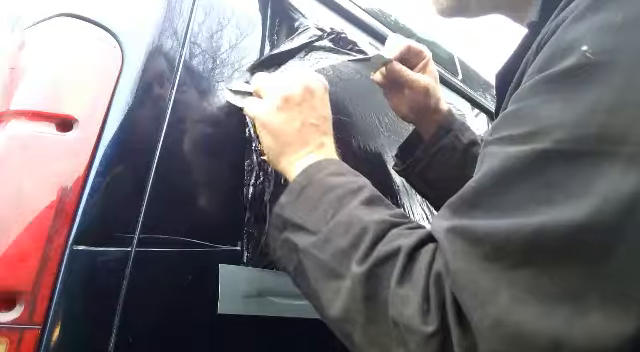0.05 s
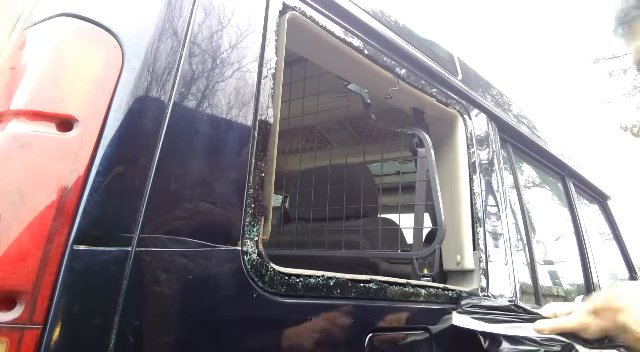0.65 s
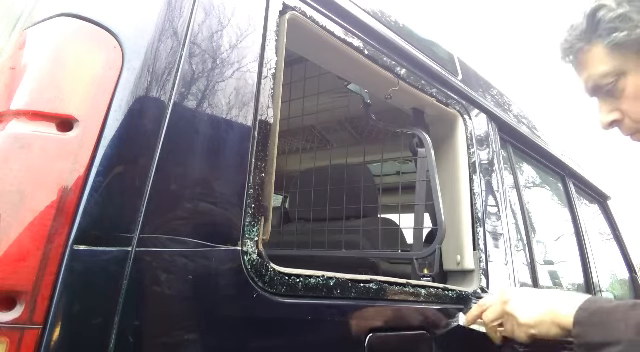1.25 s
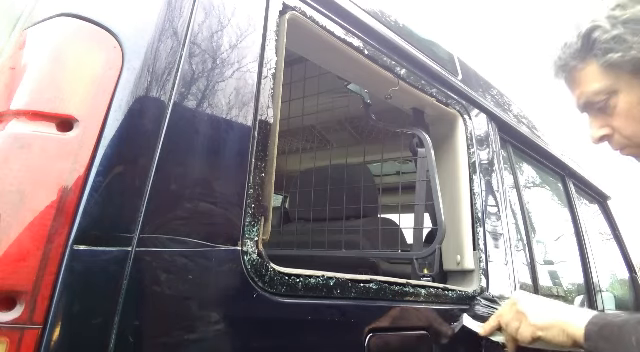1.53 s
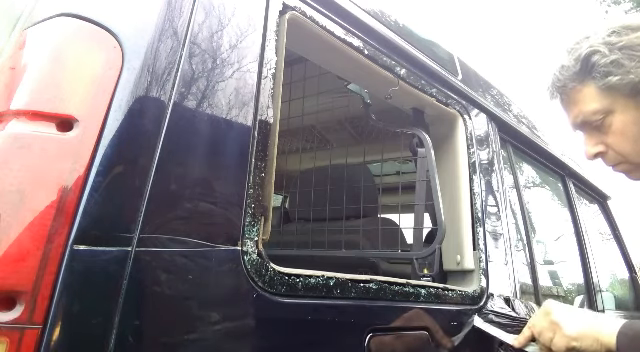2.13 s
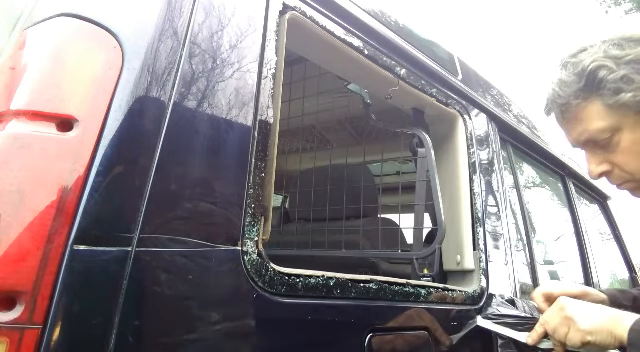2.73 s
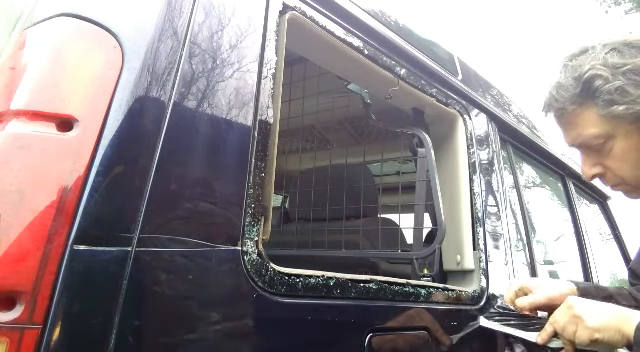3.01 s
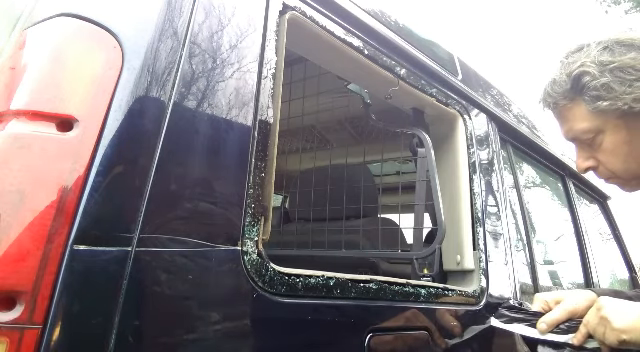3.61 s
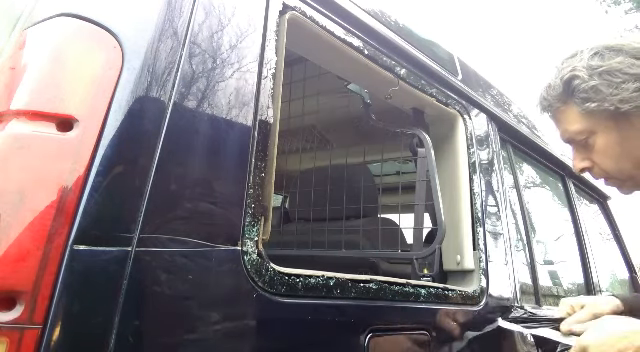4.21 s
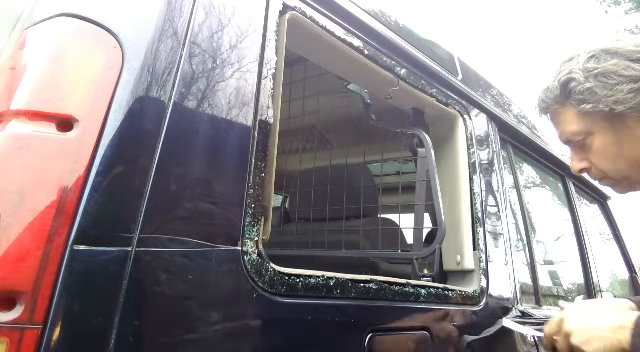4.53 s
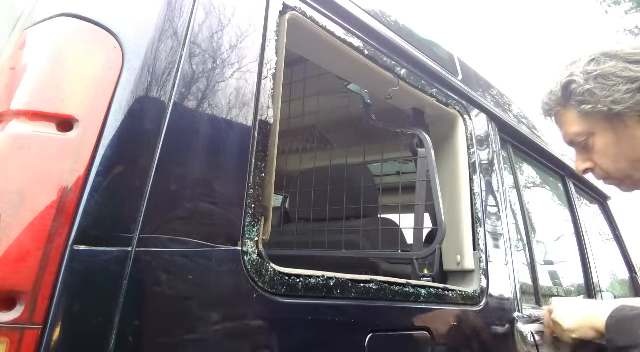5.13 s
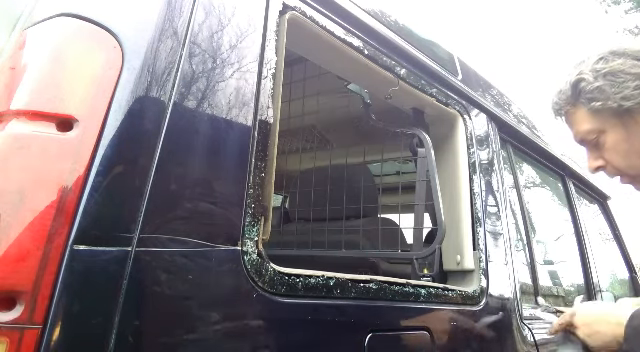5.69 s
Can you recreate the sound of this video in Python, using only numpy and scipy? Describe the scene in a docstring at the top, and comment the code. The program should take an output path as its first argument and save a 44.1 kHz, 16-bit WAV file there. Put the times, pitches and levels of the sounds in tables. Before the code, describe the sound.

Close outdoor crackle of duct tape and plastic film being tugged and peeled from a car's side, ending in a hard rip and thud.

```python
"""Outdoors by a parked car, a small stereo microphone close to a side window covered in plastic and tape.
First a few hard tugs make the stretched sheet snap and drum on the bodywork, until an edit cuts them off.
A second shot begins quietly, then duct tape is picked and peeled a little farther to the right: glue
crackles as it slips, loose film slides, wrinkles tick. Just past five seconds a last hard rip sets the
side panel ringing with a full thud. Light wind touches the microphone throughout."""
import sys
import numpy as np
from scipy import signal
from scipy.fft import rfft, irfft
from scipy.io import wavfile

SR = 44100
rng = np.random.default_rng(int(sys.argv[2]) if len(sys.argv) > 2 else 0)


def store_pcm(level_fs):
    """Save levels as 16-bit WAV."""
    pcm = np.round(np.clip(level_fs, -1, 1) * 32767).astype(np.int16)
    wavfile.write(sys.argv[1], SR, np.atleast_2d(pcm).T)


N = 262659
CUT_S = 0.528   # the edit between the two shots
PUSH_DELAY_S = 0.0007   # from the start of a snap to its push


def handling(levels, surface_modes, snap_ring, start, end):
    """One stretch of work on the film, sounding through the surface that holds it."""
    # creases snapping and tape letting go: t/s, crack level/dB, blow level/dB
    all_snaps = [(0.0396, -25.5, -34.5), (0.0487, -29, -32), (0.054, -33, -43), (0.124, -35, -47),
                 (0.168, -22.5, -28), (0.1839, -26.5, -32.5), (0.198, -31.5, -34.5), (0.2425, -28.5, -38),
                 (0.3455, -36, -45), (0.4357, -26.5, -29), (0.45, -34, -44), (0.4867, -22, -30),
                 (0.4953, -23.5, -32), (0.515, -29, -33), (0.5257, -31, -46), (1.5285, -38, -43.5),
                 (1.7148, -33.5, -38), (1.742, -33, -37), (1.788, -29, -33), (1.8162, -34, -38),
                 (2.021, -29, -43), (2.0576, -16.5, -67), (2.103, -21, -59), (2.221, -10, -45.5),
                 (2.427, -33, -50), (2.5863, -29.5, -49.5), (3.041, -26, -43), (3.123, -30.5, -50),
                 (3.1994, -28.5, -36), (3.3917, -28, -36.5), (3.72, -29, -36), (4.263, -30, -41.5),
                 (5.1251, -33, -38), (5.1896, -21.5, -25.5), (5.2029, -24.5, -28), (5.482, -37, -42),
                 (5.5126, -24, -32.5)]
    # fingers bumping the bodywork and dull pops of the film: t/s, level/dB, f/Hz
    all_bumps = [(0.255, -31, 75), (0.316, -21.5, 191), (1.529, -28, 1700), (2.362, -30, 395),
                 (2.3624, -33.5, 1150), (2.428, -32.5, 392), (2.4287, -35, 1120), (3.033, -29.5, 420),
                 (3.266, -23, 1750)]
    snaps = [row for row in all_snaps if start <= row[0] < end]
    bumps = [row for row in all_bumps if start <= row[0] < end]
    drum_db, peel_db, rub_db = levels
    drive = peeling(drum_db, peel_db) + blows(snaps) + scrapes()
    surface = resonant(drive, surface_modes, width_at_1k_hz=17.3)
    film = cracks(snaps) + snap_ring(snaps) + crinkles(rub_db) + sliding(rub_db)
    t = np.arange(N) / SR
    return (surface + film + knocks(bumps)) * ((t >= start) & (t < end))


def effort():
    """The hands hold, pull and slide the film. Gives curves of drumming, crackle and rubbing in dB."""
    # pulls on the tape: t/s of greatest tension, length/s, drumming level/dB, crackle level/dB
    pulls = [(0.08, 0.097, -50, -52.5), (0.243, 0.054, -44.5, -51.5), (0.453, 0.027, -43, -55),
             (0.702, 0.024, -39.5, -51), (1.308, 0.062, -50, -62), (1.404, 0.057, -42.5, -51),
             (1.581, 0.023, -45.5, -56.5), (1.718, 0.12, -40, -46.5), (1.832, 0.13, -45, -50.5),
             (2.034, 0.18, -46, -51.5), (2.252, 0.06, -65, -47.5), (2.352, 0.14, -49, -52),
             (3.06, 0.17, -50, -55), (3.204, 0.11, -42, -44.5), (3.257, 0.038, -50, -46),
             (3.401, 0.021, -38.5, -46), (3.43, 0.077, -42.5, -49), (3.649, 0.13, -42, -47.5),
             (3.73, 0.085, -37.5, -53), (3.897, 0.17, -49.5, -52), (4.208, 0.1, -40.5, -51.5),
             (4.485, 0.18, -46.5, -63), (4.554, 0.15, -53, -53), (4.779, 0.11, -42, -51),
             (4.987, 0.088, -43, -53.5), (5.142, 0.024, -37.5, -43.5), (5.23, 0.075, -35, -41.5),
             (5.513, 0.063, -46.5, -45.5)]
    # loose film drawn through the hand: middle t/s, half length/s, rubbing level/dB, crackle level/dB
    slides = [(0.71, 0.045, -59.5, -59.5), (1.14, 0.037, -59.5, -67), (1.614, 0.11, -61, -53),
              (2.108, 0.055, -51, -70), (2.516, 0.056, -52.5, -55), (2.847, 0.055, -55, -52.5),
              (3.594, 0.21, -55, -75), (4.142, 0.12, -49, -74), (4.385, 0.094, -49.5, -51.5),
              (5.946, .14, -47.5, -75)]
    # brief dips where drumming and crackle drop out and the hiss remains: middle t/s, half length/s
    dips = [(2.75, 0.012), (3.346, 0.005), (4.113, 0.03), (4.359, 0.018), (5.175, 0.0036), (5.926, 0.063)]
    t = np.arange(N) / SR
    # the hands never hold quite still; the second shot begins quietly; taut film hardly rubs
    quiet, taut = (t >= CUT_S) & (t < 0.675), t < CUT_S
    drum = from_db(-56.5 - 23 * quiet) ** 2
    peel = from_db(-63 - 23 * quiet) ** 2
    rub = from_db(-63 - 5 * quiet - 5.5 * taut) ** 2
    build, release = 0.65, 0.85   # rise and fall by a factor e, as shares of a pull's length
    for s, length_s, drum_db, peel_db in pulls:
        away = np.maximum((s - t) / build, (t - s) / release) / length_s
        near = away < 5
        tension = np.exp(-away[near] ** 1.28)
        drum[near] += (tension * from_db(drum_db)) ** 2
        peel[near] += (tension * from_db(peel_db)) ** 2
        rub[near] += (tension * from_db(peel_db - 4.5)) ** 2
    rub += swells([(s, half_s, db) for s, half_s, db, _ in slides], steepness=2.13)
    peel += swells([(s, half_s, db) for s, half_s, _, db in slides], steepness=2.13)
    # one strip of tape unzips at an even speed, then stops
    from_s, to_s, edge_s = 2.585, 2.752, 0.013
    unzipping = (np.tanh((t - from_s) / edge_s) - np.tanh((t - to_s) / edge_s)) / 2
    rub += unzipping * from_db(-47) ** 2
    peel += unzipping * from_db(-50.5) ** 2
    dip_db = -19.5 * sum(np.exp(-((t - s) / half_s) ** 2) for s, half_s in dips)
    return power_db(drum) + dip_db, power_db(peel) + dip_db, power_db(rub)


def cracks(snaps):
    """A crease flips with a bright crack, which comes back at once off the door."""
    # spectrum of a crack: f/Hz, relative level/dB
    spectrum = [(500, -17), (1500, -25), (3000, -13), (4600, 1), (5800, -0.5), (6700, 1.5), (12000, -2.5),
                (15000, -5), (17000, -37)]
    door_echo_s = 0.0021
    s, crack_db, _ = np.transpose(snaps)
    flips = bursts(s, crack_db, rise_s=0.00061, t60=0.0047)
    echo = from_db(-5) * np.interp(np.arange(N) - door_echo_s * SR, np.arange(N), flips)
    early = scattered(flips + echo, wet_db=-5.5, t60=0.0037)
    return from_db(-4.0) * coloured(scattered(early, wet_db=-3.5, t60=0.047), spectrum)


def blows(snaps):
    """The jerk of each snap passes into the surface under the tape."""
    # spectrum of a blow: f/Hz, relative level/dB
    spectrum = [(40, -23), (130, -8), (280, -1), (500, -4), (750, -9.5), (1250, -7), (1750, -11),
                (4000, -7.5), (9000, -44.5)]
    s, _, blow_db = np.transpose(snaps)
    ragged = from_db(2.3 * drift(500) - 1)
    jerks = ragged * bursts(s, blow_db, rise_s=0.00088, t60=0.024)
    return from_db(1.5) * coloured(scattered(jerks, wet_db=-3.5, t60=0.062), spectrum)


def sheet_thumps(snaps):
    """Each jerk thumps the stretched sheet like a slack drum skin, with a short hollow note."""
    # broad notes of the sheet: f/Hz, level/dB relative to the blow, t60/s
    notes = [(203, -8, 0.07), (331, -2.5, 0.046), (1160, 2, 0.022)]
    out = np.zeros(N)
    for s, _, blow_db in snaps:
        push = np.arange(N) == int((s + PUSH_DELAY_S) * SR)
        for hz, db, t60 in notes:
            detune = 1 + 0.045 * rng.standard_normal()
            out += ring(from_db(blow_db + db) * push, hz * detune, t60)
    return out


def crease_ring(snaps):
    """The stiff edge of the tape rings after each crack, with a slightly different balance every time."""
    # modes of the tape's edge: f/Hz, level/dB relative to the crack
    modes = [(1900, -32), (3000, -25.5), (4800, -33), (5200, -13), (7117, -26), (7790, -22), (8177, -18.5),
             (8690, -18), (10080, -15)]
    s, crack_db, _ = np.transpose(snaps)
    strengths_db = crack_db[:, None] + 1.5 * rng.standard_normal((len(s), len(modes)))
    out = np.zeros(N)
    for k, (hz, db) in enumerate(modes):
        clicks = np.zeros(N)
        clicks[((s + PUSH_DELAY_S) * SR).astype(int)] = from_db(strengths_db[:, k] + db)
        out += ring(clicks, hz, t60=0.033)
    return out


def peeling(drum_db, peel_db):
    """Glue lets go in slips: the big ones drum on the surface, the small ones crackle."""
    # spectrum of the drumming surface: f/Hz, relative level/dB
    drum_spectrum = [(40, -16.5), (100, -4), (150, 2), (300, -1), (480, -2.5), (700, -11.5), (1000, -14),
                     (1500, -14.5), (2500, -35), (6000, -46)]
    # spectrum of the crackling glue: f/Hz, relative level/dB
    peel_spectrum = [(300, 2), (800, 5.5), (1400, 4), (2000, 7.5), (3300, 4), (5000, 1.5), (8000, -9),
                     (16000, -41)]
    tugs = grains(per_s=1500, spread_db=2.0, clump_db=2.5, clump_rate=49) * from_db(drum_db)
    slips = grains(per_s=1300, spread_db=1.5, clump_db=4.0, clump_rate=64) * from_db(peel_db)
    drum = coloured(scattered(tugs, wet_db=-5.5, t60=0.025), drum_spectrum)
    crackle = coloured(scattered(slips, wet_db=1.0, t60=0.022), peel_spectrum)
    return from_db(-5.5) * drum + from_db(-3.5) * crackle


def panel_thud():
    """The last hard rip sets the car's side panel ringing with a full thud; low modes ring longest."""
    # panel modes struck by the rip: f/Hz, level/dB
    modes = [(143, -42.5), (233, -39.5), (273, -43), (350, -39), (417, -44), (612, -35.5), (863, -34),
             (1348, -46), (1538, -34), (1783, -29.5)]
    rip_s, swell_s, t60_at_1k_s = 5.191, 0.011, 0.21
    t = np.maximum(np.arange(N) / SR - rip_s, 0)
    fall_db = 60 * t / t60_at_1k_s
    thud = sum(from_db(db - fall_db * np.sqrt(hz / 1000)) * np.sin(2 * np.pi * (hz * t + rng.random()))
               for hz, db in modes)
    return (1 - np.exp(-t / swell_s)) * thud


def knocks(bumps):
    """Soft contacts have no sharp edge and ring only briefly."""
    out = np.zeros(N)
    for s, db, hz in bumps:
        contact = np.arange(N) == int(s * SR)
        push = signal.lfilter(*signal.butter(2, 2 * hz, fs=SR), contact + 1e-18)
        out += from_db(db) * ring(push, hz, t60=0.26 / np.sqrt(hz))
    return out


def ticks():
    """A wrinkle flips with one sharp click, each at a pitch of its own."""
    # single wrinkles in the tape: t/s, level/dB
    wrinkles = [(1.2002, -34), (1.3771, -38.5), (1.4192, -33), (1.587, -35), (1.6746, -33), (1.8961, -33),
                (2.1418, -35), (2.3461, -38), (2.4683, -28), (2.6374, -32), (2.6489, -33), (2.7599, -32.5),
                (2.8474, -32), (2.9014, -30.5), (3.1777, -31), (3.2573, -30), (3.6509, -31), (3.7045, -27),
                (3.7723, -28), (3.8911, -30), (4.501, -29), (4.5555, -33), (4.6114, -34)]
    out, length = np.zeros(N), SR // 100
    decay = np.exp(-np.arange(length) / SR / 0.00068)
    for s, db in wrinkles:
        start, hz = int(s * SR), rng.uniform(4530, 8500)
        click = ring(rng.standard_normal(length) * decay, hz, t60=4 / hz)
        out[start:start + length] += from_db(db + 1) * click / np.abs(click).max()
    return scattered(out, wet_db=1, t60=0.028)


def sliding(rub_db):
    """Loose film rubs on itself with a fine rasp."""
    # spectrum of rubbing film: f/Hz, relative level/dB
    spectrum = [(400, -9), (1500, -13.5), (3000, -0.5), (5000, 3), (7000, 3), (8800, 4), (10500, 1.5),
                (12500, -2.5), (14500, -10), (16500, -58)]
    rub = from_db(-3.5) * grains(per_s=9000, spread_db=5.0, clump_db=2.5, clump_rate=150)
    return coloured(scattered(rub * from_db(rub_db), wet_db=6.0, t60=0.0049), spectrum)


def crinkles(rub_db, size_count=12):
    """Small wrinkles pop one by one; each size rings at its own pitch for a few cycles."""
    pops = grains(per_s=170, spread_db=3.5, clump_db=4.5, clump_rate=30) * from_db(rub_db)
    size = rng.integers(0, size_count, N)
    rings = sum(np.sqrt(hz / SR) * ring(pops * (size == k), hz, t60=7 / hz)
                for k, hz in enumerate(np.linspace(1600, 11500, size_count)))
    return from_db(-7.5) * scattered(rings, wet_db=-9.5, t60=0.016)


def scrapes():
    """Dragged tape sticks and slips, and the fold it pulls up gives the rasp a hollow pitch."""
    # short drags over the paint: middle t/s, half length/s, level/dB, f/Hz
    drags = [(1.734, 0.016, -45.5, 470), (1.802, 0.013, -48, 453), (2.311, 0.0059, -44, 2050),
             (3.207, 0.0087, -44.5, 880), (3.673, 0.054, -48, 900), (5.146, 0.016, -42.5, 1700),
             (5.219, 0.016, -38.5, 1600)]
    t, out = np.arange(N) / SR, np.zeros(N)
    slips = grains(per_s=1200, spread_db=1.0, clump_db=1.5, clump_rate=58)
    for s, half_s, db, hz in drags:
        swell = from_db(db) * np.exp(-((t - s) / half_s) ** 2 / 2)
        out += swell * rms_one(ring(slips, hz, t60=10 / hz))
    return out


def booming(x, hz=134, width_hz=80):
    """The panel's deepest band is driven more or less strongly as the hands move along it."""
    # gain of that band, set by where the tape holds the panel: t/s, level/dB
    boom = [(0.5, -18), (1.8, -9), (3.1, 1), (4.3, 1), (5.6, -6.5)]
    deep = signal.lfilter(*signal.iirpeak(hz, hz / width_hz, fs=SR), x)
    return x + (from_db(in_time(boom)) - 1) * deep


def hollow(x, width_hz=44, block=256):
    """The pocket under the lifted tape adds one resonance that glides as the tape moves."""
    # pitch of the pocket, which changes with its size: t/s, f/Hz
    pitch = [(1.4, 320), (1.75, 428), (1.9, 363), (2.1, 412), (3.2, 344), (3.7, 296), (5.2, 264)]
    centre_hz = in_time(pitch)
    r = np.exp(-np.pi * width_hz / SR)
    out, state = np.zeros_like(x), np.zeros((2, 2))
    for i in range(0, N, block):
        poles = [1, -2 * r * np.cos(2 * np.pi * centre_hz[i] / SR), r * r]
        out[:, i:i + block], state = signal.lfilter([1, 0, -1], poles, x[:, i:i + block], zi=state)
    return x + from_db(-4.5) * (1 - r * r) / 2 * out


def air():
    """Lumpy gusts over a light breeze, mostly on the right port, and a quiet outdoor floor."""
    # gusts on the microphone: middle t/s, half length/s, level/dB
    gusts = [(0.12, 0.13, -49), (0.33, 0.089, -41), (3.04, 0.1, -49.5), (3.62, 0.065, -44.5),
             (4.04, 0.16, -48), (4.45, 0.18, -45.5), (5.36, 0.086, -48.5), (5.75, 0.1, -40)]
    # spectrum of the wind: f/Hz, relative level/dB
    wind_spectrum = [(10, -13), (28, -5.5), (50, -12.5), (90, -14.5), (180, -31), (500, -61), (2000, -83)]
    # spectrum of the open air: f/Hz, relative level/dB
    floor_spectrum = [(20, 13), (120, 9.5), (300, -4), (700, -6), (2000, -18.5), (8000, -30), (16000, -40)]
    breeze = from_db(-68.5) ** 2
    wind_db = power_db(breeze + swells(gusts, steepness=1.93))
    wind = coloured(rng.standard_normal((2, N)), wind_spectrum) * from_db(wind_db + 2.0 * drift(29))
    floor = coloured(rng.standard_normal(N) + rng.standard_normal((2, N)), floor_spectrum)
    return wind * from_db([[-7], [5.5]]) + from_db(-63.0) * floor


def at_ports(x, left_lag_ms):
    """Two close microphone ports share the bass; one hears later, and the right gets less treble."""
    # treble shading: t/s, left minus right level/dB
    shade = [(0, 6), (0.5, 10.5), (0.7, 3), (1.7, 3.5), (2.22, 7.5), (2.4, 2.5), (5.9, 5)]
    x = x - signal.sosfilt(signal.butter(1, 450, fs=SR, output="sos"), x - x.mean(axis=0))
    treble = signal.sosfilt(signal.butter(1, 3500, "high", fs=SR, output="sos"), x)
    left, right = x + treble * (from_db(in_time(shade) * np.array([[.5], [-.5]])) - 1)
    taps = np.arange(-32, 33)
    delay = np.sinc(taps - left_lag_ms * SR / 1000) * np.hanning(len(taps))
    return np.array([np.convolve(left, delay, "same"), right])


def scattered(x, wet_db, t60):
    """Countless reflections off film and car: each port gets its own noise tail that follows the energy."""
    keep = from_db(-120 / (t60 * SR))
    tail = np.sqrt(signal.lfilter([1 - keep], [1, -keep], x ** 2 + 1e-18))
    return x + from_db(wet_db) * tail * rng.standard_normal((2, N))


def resonant(x, modes, width_at_1k_hz):
    """Modes stand out of the broad sound; the higher ones are wider and die sooner."""
    out = x
    for hz, db in modes:
        r = np.exp(-np.pi * width_at_1k_hz * np.sqrt(hz / 1000) / SR)
        poles = [1, -2 * r * np.cos(2 * np.pi * hz / SR), r * r]
        out = out + from_db(db) * (1 - r * r) / 2 * signal.lfilter([1, 0, -1], poles, x)
    return out


def ring(x, hz, t60):
    """A unit click sets a sine of height 1 ringing."""
    r, w = from_db(-60 / (t60 * SR)), 2 * np.pi * hz / SR
    return signal.lfilter([0, np.sin(w)], [1, -2 * r * np.cos(w), r * r], x + 1e-18)


def grains(per_s, spread_db, clump_db, clump_rate):
    """Tiny random slips of uneven size that come in clumps; rms 1."""
    sizes = from_db(spread_db * np.minimum(rng.exponential(1, N), 4)) * rng.choice([-1, 1], N)
    slipping = rng.random(N) < per_s / SR
    return rms_one(slipping * sizes * from_db(clump_db * drift(clump_rate)))


def bursts(times, levels_db, rise_s, t60):
    """Each snap is a quick avalanche of slips that swells and dies."""
    t, power = np.arange(SR // 2) / SR, np.zeros(N + SR)
    shape = (1 - np.exp(-(t / rise_s) ** 2)) * from_db(-60 * t / t60)
    for s, db in zip(times, levels_db):
        start = int(s * SR)
        power[start:start + len(t)] += (from_db(db) * shape / shape.max()) ** 2
    return np.sqrt(power[:N]) * rng.choice([-1, 1], N)


def swells(rows, steepness):
    """Power of smooth swells (middle t/s, half length/s, level/dB); steepness 2 is a bell curve."""
    t = np.arange(N) / SR
    return sum(from_db(db) ** 2 * np.exp(-np.abs((t - s) / half_s) ** steepness)
               for s, half_s, db in rows)


def coloured(x, spectrum, size=8192):
    """Minimum-phase filter that follows a spectrum and keeps the power of white noise."""
    hz, db = np.transpose(spectrum)
    bin_hz = np.arange(size // 2 + 1) * SR / size
    gain = rms_one(from_db(np.interp(np.log(bin_hz + 1), np.log(hz), db)))
    cepstrum = irfft(np.log(gain))
    cepstrum[1:size // 2] *= 2
    cepstrum[size // 2 + 1:] = 0
    impulse = irfft(np.exp(rfft(cepstrum)))
    return signal.oaconvolve(x, impulse[None], axes=1)[:, :N]


def drift(rate):
    """A random curve through `rate` normal draws a second."""
    knots = rng.standard_normal(N // 40)
    return np.interp(np.arange(N) * rate / SR, np.arange(len(knots)), knots)


def in_time(rows):
    """A curve through rows of t/s and value."""
    return np.interp(np.arange(N) / SR, *np.transpose(rows))


def from_db(db):
    """Decibels to gain."""
    return 10 ** (np.asarray(db) / 20)


def power_db(power):
    """Power to decibels."""
    return 10 * np.log10(power + 1e-12)


def rms_one(x):
    """Scale to unit power."""
    return x / np.sqrt(np.mean(x ** 2) + 1e-20)


def scene():
    """An edit cuts the tugging off abruptly; the peeling follows farther right, all in light wind."""
    # modes of the sheet stretched over the window: f/Hz, level/dB
    sheet_modes = [(205, 6), (272, 3), (338, 8.5), (395, 4.5), (542, 5.5), (605, 7.5), (686, 9),
                   (1160, 9.5), (1365, 3.5)]
    # modes of the car's side panel: f/Hz, level/dB
    panel_modes = [(142, 8), (190, -1.5), (273, -0.5), (418, 1.5), (464, -0.5), (570, -3.5), (795, 1),
                   (872, 3), (1075, 1), (1295, -0.5)]
    levels = effort()
    sheet = handling(levels, sheet_modes, sheet_thumps, start=0, end=CUT_S)
    tugging = at_ports(sheet, left_lag_ms=-0.12)
    tape = handling(levels, panel_modes, crease_ring, start=CUT_S, end=N / SR)
    picking = at_ports(hollow(booming(tape)) + ticks() + panel_thud(), left_lag_ms=0.12)
    return tugging + picking + air()


def record(dry):
    """The top is cut steeply above 16.4 kHz."""
    return signal.sosfilt(signal.ellip(10, .1, 90, 16400, fs=SR, output="sos"), dry)


dry = scene()
out = record(dry)
store_pcm(out)
```